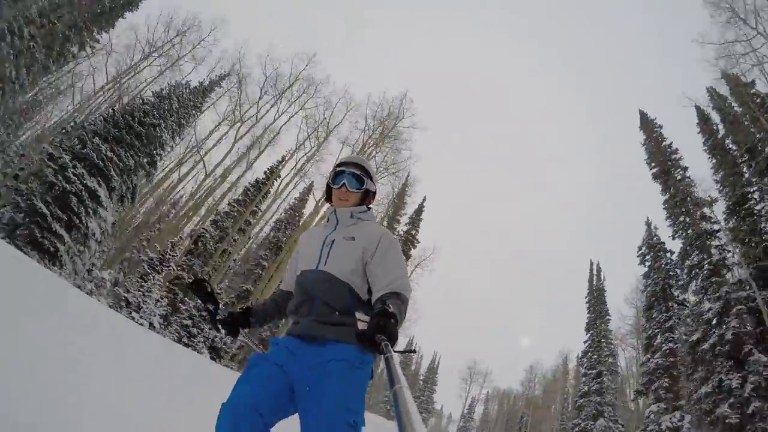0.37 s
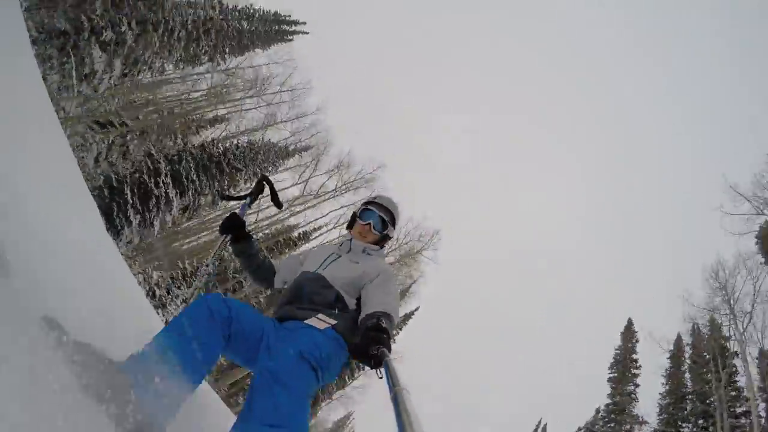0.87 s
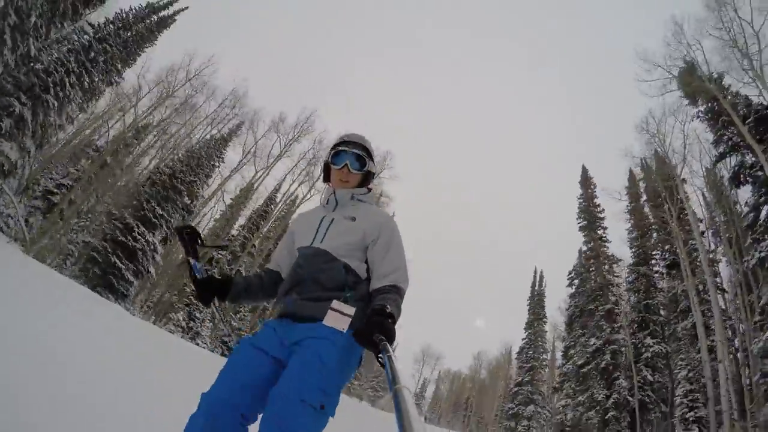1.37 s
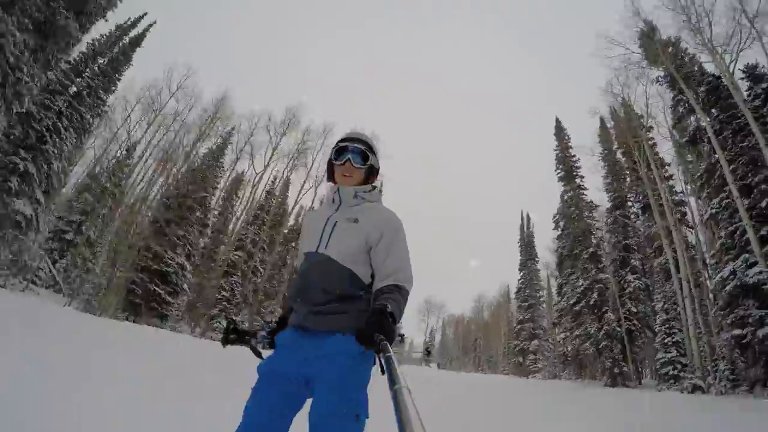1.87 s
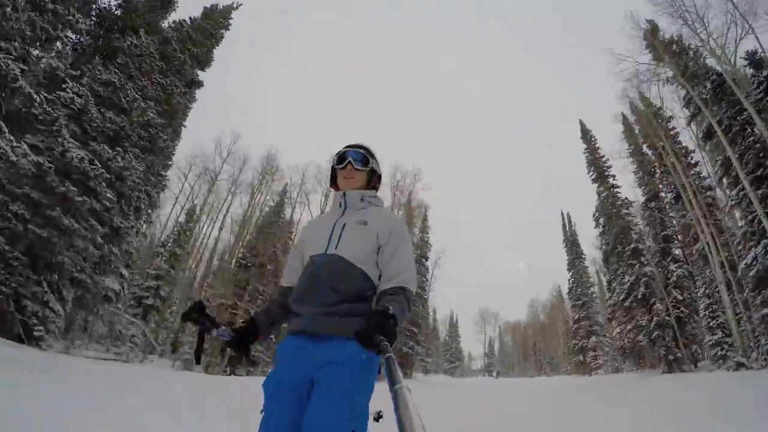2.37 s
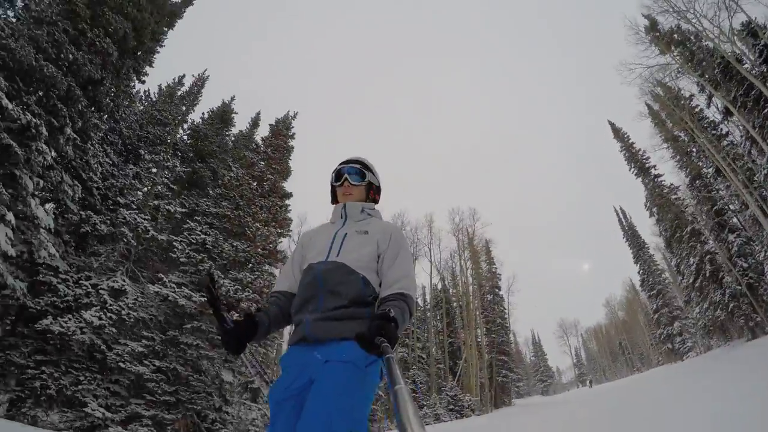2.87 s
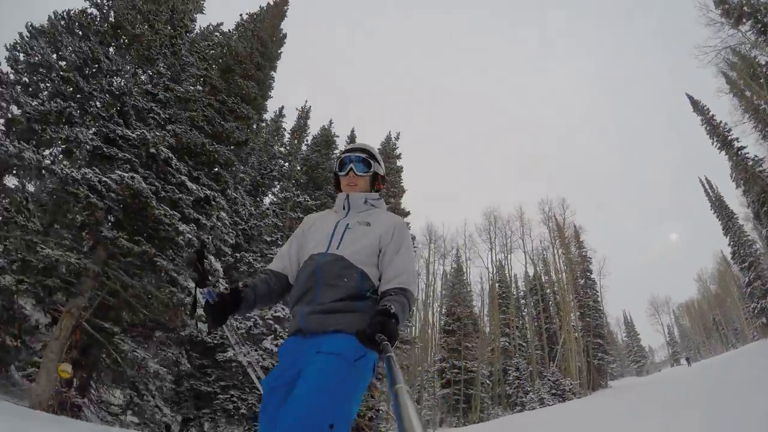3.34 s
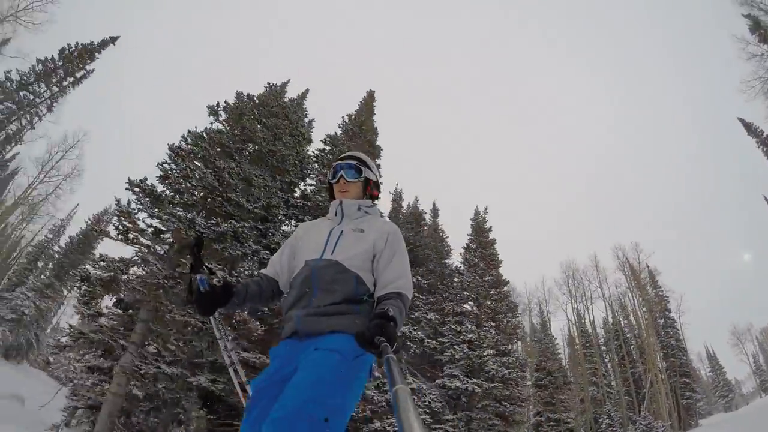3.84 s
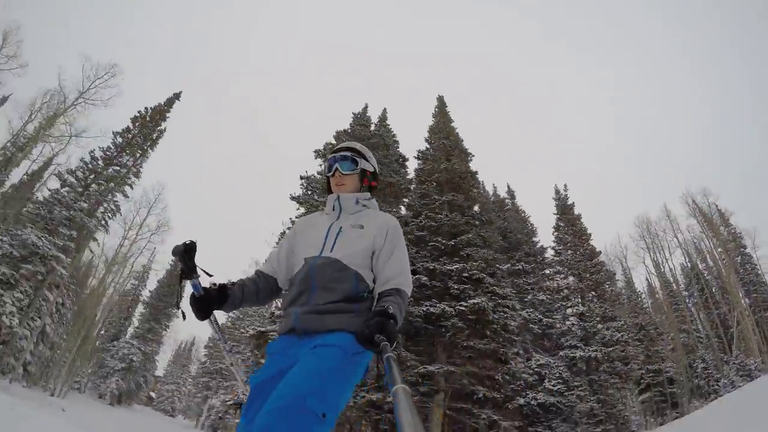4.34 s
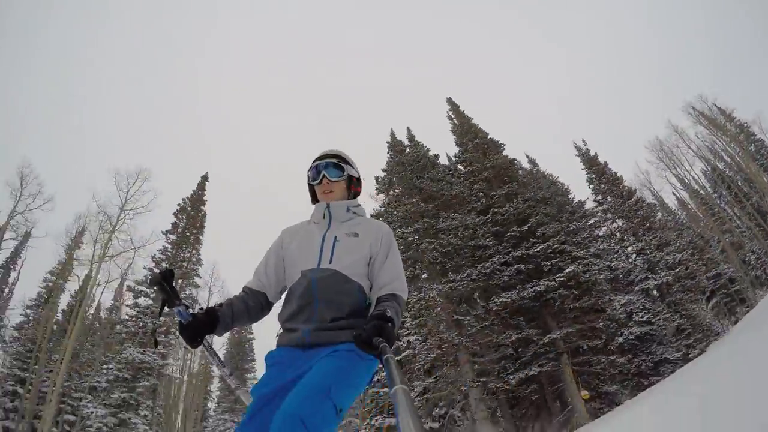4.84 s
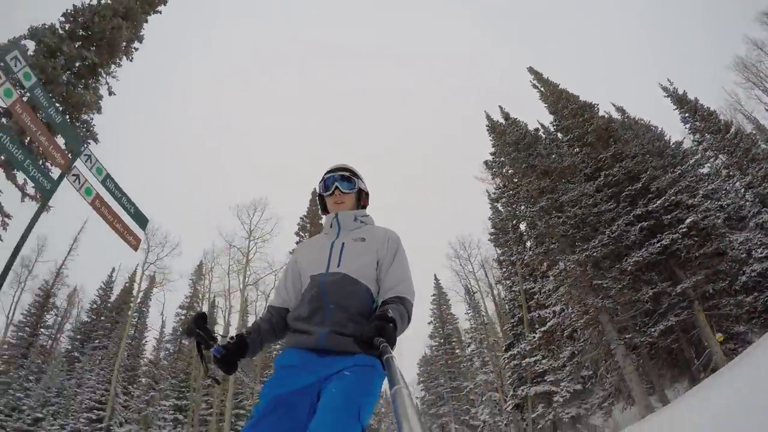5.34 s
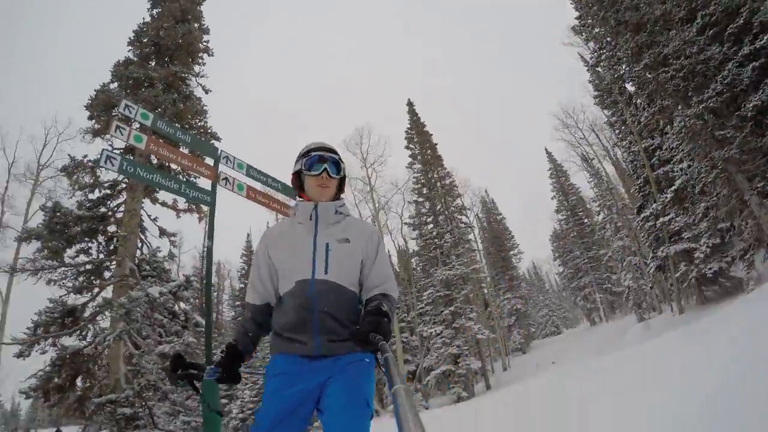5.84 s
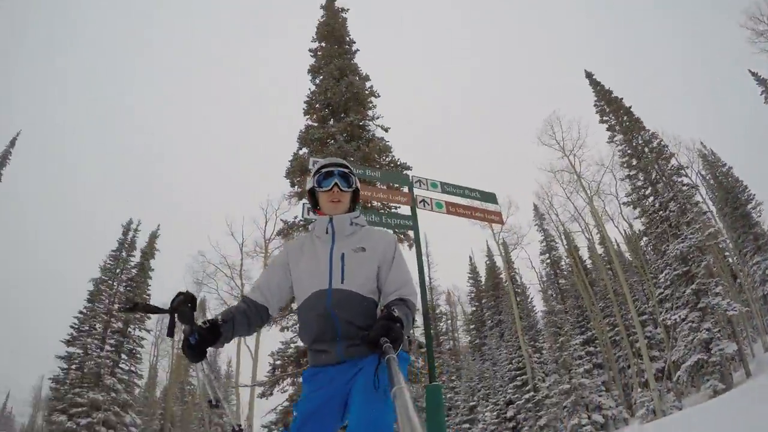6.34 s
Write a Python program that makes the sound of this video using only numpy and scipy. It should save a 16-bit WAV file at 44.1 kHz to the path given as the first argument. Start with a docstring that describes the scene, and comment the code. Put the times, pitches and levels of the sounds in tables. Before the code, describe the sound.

Skis hiss and crunch over snow as wind rumbles on a pole-mounted camera, with ticking grains, mount knocks and one deep jolt.

```python
"""Wind buffets the microphone port of a small housed camera on a pole: deep and fluttering bands of noise.
Its skier glides down a quiet slope: noise and clumped clicks hiss and crunch, narrow noise bands swell.
Snow grains tick on the housing as noisy clicks; skis and ticks pass the housing resonances.
Knocks, rubs and a late creak ring the modes of the mount; a jolt of the pole is a falling sine."""
import sys
import numpy as np
from scipy import signal
from scipy.fft import rfft, irfft
from scipy.io import wavfile
from scipy.ndimage import uniform_filter1d

SR = 44100
rng = np.random.default_rng(int(sys.argv[2]) if len(sys.argv) > 2 else 0)


def attenuation_scalar(level_db):
    """Turn a level in dB into a linear amplitude multiplier (20 dB per decade)."""
    decades = np.asarray(level_db, float) / 20
    return 10 ** decades


def bounce(signal):
    """Save signal as a 16-bit WAV file at the path given by the first command-line argument."""
    frames = np.transpose(np.atleast_2d(signal))
    limited = np.clip(frames, -1, 1)
    pcm = np.round(limited * 32767).astype(np.int16)
    wavfile.write(sys.argv[1], SR, pcm)


N = 295854


def unit_rms(x):
    """Scales to an rms of 1."""
    return x / np.sqrt(np.mean(x ** 2) + 1e-20)


def in_time(rows):
    """Interpolates each column at every sample; column 0 is t/s."""
    t_s, *columns = np.transpose(rows)
    return [np.interp(np.arange(N) / SR, t_s, column) for column in columns]


def band(x, low_hz, high_hz, order=2):
    """Butterworth bandpass."""
    sos = signal.butter(order, [low_hz, high_hz], "band", fs=SR, output="sos")
    return signal.sosfilt(sos, x + 1e-18)


def coloured(x, points):
    """Applies a spectral gain, interpolated in dB over log frequency."""
    f_hz = np.maximum(np.arange(N // 2 + 1) * SR / N, 1)
    point_hz, point_db = np.transpose(points)
    gain_db = np.interp(np.log(f_hz), np.log(point_hz), point_db)
    return irfft(rfft(x) * attenuation_scalar(gain_db), N)


def drift(corner_hz):
    """Slow random signal of rms 1: two-pole lowpassed noise."""
    step = 40  # samples between slow values
    r = np.exp(-2 * np.pi * corner_hz * step / SR)
    noise = rng.standard_normal(N // step + 2002)
    slow = signal.lfilter([1], [1, -2 * r, r * r], noise)[2000:]
    return np.interp(np.arange(N) / step, np.arange(len(slow)), unit_rms(slow))


def grains(per_s, spread_db):
    """Random clicks of either sign, a few much larger than the rest."""
    size_db = spread_db * np.minimum(rng.exponential(1, N), 5)
    signs = rng.choice([-1, 1], N)
    return attenuation_scalar(size_db) * signs * (rng.random(N) < per_s / SR)


def clicks(t_s, level_db):
    """Single-sample impulses at given times."""
    out = np.zeros(N)
    at = np.minimum(np.round(np.asarray(t_s) * SR).astype(int), N - 1)
    np.add.at(out, at, attenuation_scalar(level_db))
    return out


def fading(x, t60_s):
    """Every click leaves an exponentially dying trail."""
    return signal.lfilter([1], [1, -attenuation_scalar(-60 / (t60_s * SR))], x + 1e-18)


def ring(x, f_hz, t60_s):
    """A unit click sets a dying sine of initial height 1 ringing."""
    r = attenuation_scalar(-60 / (t60_s * SR))
    w = 2 * np.pi * f_hz / SR
    return signal.lfilter([0, np.sin(w)], [1, -2 * r * np.cos(w), r * r], x + 1e-18)


# housing resonances: f/Hz, width/Hz, gain/dB
HOUSING_BANDS = [(1300, 150, 4), (1735, 170, 9), (2480, 300, 6), (2870, 200, 6), (3230, 200, 4),
                 (3600, 250, 4), (3975, 120, -7), (4320, 300, 8), (5420, 200, 5), (5650, 150, -4),
                 (6850, 800, 8), (9950, 800, 7), (12200, 600, 5), (13750, 700, 5)]


def housing(x):
    """Cavities around the microphone lift most of a row of bands and dip the others."""
    for f_hz, width_hz, gain_db in HOUSING_BANDS:
        w = 2 * np.pi * f_hz / SR
        a = np.pi * width_hz / SR
        b = a * attenuation_scalar(gain_db)
        x = signal.lfilter([1 + b, -2 * np.cos(w), 1 - b], [1 + a, -2 * np.cos(w), 1 - a], x)
    return x


# wind on the port: t/s, deep buffeting level/dB, flutter level/dB
WIND_LEVELS = [(0.0, -25.5, -30.5), (0.4, -22.5, -52), (0.65, -29.5, -25.5), (0.72, -25, -30),
               (0.95, -23, -41), (1.159, -28, -65), (1.3, -39.5, -28.5), (1.46, -24, -43.5),
               (1.75, -37, -30), (2.05, -28.5, -44.5), (2.3, -32.5, -32.5), (2.42, -36.5, -43.5),
               (3.1, -31.5, -31.5), (3.5, -36, -32.5), (4.1, -32, -40), (4.4, -33.5, -39.5),
               (4.7, -28, -29.5), (5.0, -31, -30), (5.25, -32.5, -43), (5.72, -25.5, -58), (6.2, -34, -51),
               (6.5, -33, -47), (6.71, -32.5, -55)]
# buffeting spectrum: f/Hz, gain/dB
BUFFET_SPECTRUM = [(8.8, -21), (15, 6), (32, 0), (59, 0.5), (83, -17), (108, -29), (154, -41), (200, -75),
                   (260, -33.5), (440, -120)]


def wind():
    """Eddies push on the port, slow deep ones and a quicker flutter; each evened so that gusts set its swing."""
    gust_db, gust_hz = [2, 3.5], 8.2  # deep, flutter; drift corner
    low_hz, high_hz = [12, 55], [55, 260]
    out = 0
    eddies = coloured(rng.standard_normal((2, N)), BUFFET_SPECTRUM)
    for level_db, swing_db, eddy, low, high in zip(in_time(WIND_LEVELS), gust_db, eddies, low_hz, high_hz):
        push = unit_rms(band(eddy, low, high))
        local_rms = np.sqrt(uniform_filter1d(push ** 2, size=3000) + 0.049)
        gusts = attenuation_scalar(swing_db * drift(gust_hz))
        out = out + attenuation_scalar(level_db) * unit_rms(gusts * push / local_rms)
    return out


# skis on snow: t/s, edge pressure as scrape level/dB, low rasp over scrape/dB, brightness/dB
SKI_PRESSURE = [(0.0, -48.5, 7.5, -7.5), (0.3, -45.5, -19, -0.5), (0.5, -46, -7, -1), (0.76, -45.5, -19, 2),
                (1.1, -44.5, -1.5, -2), (1.29, -45.5, -2.5, -1), (1.48, -62, -5, 3.5), (1.7, -52, -19, 1),
                (2.07, -55.5, 4, -4.5), (2.4, -59.5, -2, 2.5), (2.7, -58, -7, -3), (3.25, -59.5, 4.5, -1.5),
                (3.7, -56, -1.5, 1), (4.07, -60, 2.5, 0), (4.2, -52.5, -1.5, 2), (4.32, -47.5, -4, 2),
                (4.4, -43, -1.5, 1.5), (4.55, -41, -3.5, 1.5), (4.8, -42.5, -6, -0.5), (4.97, -50, -3, 1.5),
                (5.19, -52, -5, 0.5), (5.28, -48.5, -3, 1), (5.4, -53.5, 0.5, -0.5), (5.52, -46, 1.5, -1),
                (5.62, -46, 0, -3), (5.69, -47.5, -3.5, 0), (5.77, -43, -3.5, -2.5), (5.84, -47, -3.5, -2),
                (6.05, -52, -2.5, -2.5), (6.3, -58, -0.5, -4.5), (6.56, -60, 2, -5.5), (6.63, -51, -1, -11),
                (6.71, -56.5, 2, -6)]
# low rumble of the skis: t/s, level/dB
SKI_RUMBLE = [(0.0, -46), (0.76, -46.5), (1.2, -53.5), (1.6, -53), (2.6, -54), (3.2, -54), (3.8, -57.5),
              (4.1, -56.5), (4.55, -49), (5.1, -57), (6.5, -59.5), (6.71, -56)]
# bands above the scrape: level at reference pressure/dB, share of pressure swing/1, share of brightness/1
SPRAY_BANDS = [(-57, 0.74, 0.88), (-66.5, 0.52, 0.85), (-74, 0.3, 0.61)]
# snow spectrum: f/Hz, gain/dB
SNOW_SPECTRUM = [(100, 14.5), (200, -11.5), (350, -10.5), (800, -16), (1100, -5.5), (1500, 1), (2100, -9),
                 (3500, -11), (5000, -22), (7200, -28.5), (8200, -36), (12000, -44), (16000, -38)]


def skis():
    """Smooth sliding noise plus crystals that break in clumps; all bands share the same crunch."""
    reference_db = -52  # scrape level at reference pressure
    clumps = attenuation_scalar(1.4 * drift(13.0) + 2.5 * drift(40.0))
    crunch = unit_rms(grains(1500.0 * clumps, spread_db=4.5))
    slide = rng.standard_normal(N) * attenuation_scalar(0.5 * drift(19.0))
    snow = housing(coloured(slide + 0.62 * crunch, SNOW_SPECTRUM))

    scrape_db, rasp_db, bright_db = in_time(SKI_PRESSURE)
    levels_db = in_time(SKI_RUMBLE) + [scrape_db + rasp_db, scrape_db]
    for base_db, pressure_share, bright_share in SPRAY_BANDS:
        pressure_db = pressure_share * (scrape_db - reference_db)
        levels_db.append(base_db + pressure_db + bright_share * bright_db)

    out = 0
    edges_hz = [130, 950, 2100, 4700, 8500, 11500, 15300]
    for level_db, low_hz, high_hz in zip(levels_db, edges_hz, edges_hz[1:]):
        hiss = unit_rms(band(snow, low_hz, high_hz, order=3))
        out = out + attenuation_scalar(level_db + 1.38 * drift(24.0)) * hiss
    return out


# narrow swelling hisses: t/s, length/s, level/dB, start f/Hz, end f/Hz, half width/Hz
AIRY_HISSES = [(0.0, 0.64, -60.5, 6900, 6940, 400), (0.221, 0.36, -48.5, 2700, 2906, 200),
               (0.997, 0.3, -46, 2410, 2910, 300), (4.3, 0.47, -50, 1748, 1732, 100),
               (5.7, 0.38, -69, 13500, 13000, 700), (5.72, 0.3, -51, 3520, 3600, 150),
               (4.187, 0.14, -43.5, 2485, 2470, 120), (5.394, 0.45, -58.5, 13800, 12600, 800),
               (5.405, 0.74, -47.5, 1762, 1717, 90), (5.577, 0.39, -54.5, 7080, 6620, 450),
               (6.585, 0.093, -56, 6370, 6230, 600)]


def airy():
    """Narrow bands of noise, each swelling and fading on a gliding carrier."""
    out, t_s = np.zeros(N), np.arange(N) / SR
    for start_s, length_s, level_db, start_hz, end_hz, half_width_hz in AIRY_HISSES:
        progress = np.clip((t_s - start_s) / length_s, 0, 1)
        turns = np.cumsum(start_hz + (end_hz - start_hz) * progress) / SR
        noise = unit_rms(band(rng.standard_normal(N), 11, half_width_hz))
        out += attenuation_scalar(level_db) * np.sin(np.pi * progress) * np.sin(2 * np.pi * turns) * noise
    return out


# harder grains on the housing: t/s, hit level/dB, body over hit/dB (before the band gain)
GRAIN_HITS = [(0.0074, -29.5, 3.5), (0.017, -27.5, -2), (0.061, -41, -10), (0.0994, -29, -5),
              (0.111, -29.5, 1), (0.128, -25, -0.5), (0.158, -27.5, 9), (0.169, -22.5, -13),
              (0.178, -37, -2), (0.1994, -35, -1), (0.212, -38, 3), (0.215, -26, 7.5), (0.227, -32, -10),
              (0.2487, -30.5, -1), (0.256, -31, -5), (0.261, -41, 9), (0.268, -33.5, 8), (0.29, -39, -4),
              (0.3297, -34, 2), (0.366, -33, -3), (0.372, -36, 6), (0.381, -41, 6), (0.404, -38.5, 12.5),
              (0.415, -31, 0.5), (0.425, -31, 1), (0.439, -31, -8), (0.4472, -28.5, -1), (0.452, -36, 3.5),
              (0.4771, -28, -1), (0.4833, -33, 3), (0.493, -33, -1), (0.504, -34, -7), (0.574, -43, 2),
              (0.5797, -31.5, -4), (0.592, -39, 10), (0.626, -45, -8), (0.6323, -31, 8), (0.641, -30, -5),
              (0.647, -35, 12), (0.669, -41, 8), (0.693, -33, -8), (0.701, -30.5, -6), (0.7098, -42, 13),
              (0.719, -41, 13), (0.727, -33, -10), (0.782, -28, 3), (0.8125, -37.5, 9), (0.825, -38, 12),
              (0.902, -37, 5), (0.923, -41, 7), (0.936, -46, -10), (0.963, -49, -8), (1.04, -30.5, -7),
              (1.07, -27.5, 5.5), (1.0766, -33, -1), (1.31, -40, -3), (1.3423, -46, -5), (1.359, -49, -14),
              (1.378, -39, -2), (1.389, -45, -4), (1.495, -41, 1), (1.502, -33.5, -1), (1.535, -48, 11),
              (1.6526, -59, 2), (1.6795, -36.5, 11), (1.685, -39, -2), (1.7062, -28.5, -11),
              (1.7124, -37, 1), (1.7313, -43, 4), (1.741, -33, -13), (1.7468, -43.5, 8.5), (1.76, -46, 7),
              (1.775, -38, -2), (1.788, -38, 0), (1.7976, -39, 4), (1.822, -36, -2), (2.0169, -31.5, -23),
              (2.0476, -34, -15), (2.056, -33.5, -3), (2.063, -40, -12), (2.069, -38, 2), (2.081, -43, 1),
              (2.1313, -42, -2), (2.2267, -35, 8.5), (2.238, -32.5, -5), (2.248, -40, -4),
              (2.3046, -30, 0.5), (2.3155, -42, 0), (2.3977, -33.5, -0.5), (2.4218, -40, 1.5),
              (2.4545, -50, 7), (2.4892, -32.5, -0.5), (2.5144, -39, 1), (2.5274, -37, 0),
              (2.5324, -35.5, 1.5), (2.552, -43, 5.5), (2.563, -38, -1), (2.6457, -36, -32),
              (2.6636, -48, -2), (2.711, -41, 1.5), (2.722, -46, -5), (2.7447, -40, 5),
              (2.761, -37.5, -0.5), (2.86, -45, 2.5), (2.8951, -35.5, -5), (2.905, -43, 9.5),
              (2.9325, -35.5, 0), (2.954, -36.5, -18), (2.9912, -45, -18), (3.0995, -39.5, 4),
              (3.153, -34.5, -12), (3.17, -43, -16), (3.2412, -47.5, 8), (3.249, -45, -4),
              (3.2716, -30.5, 2.5), (3.282, -36.5, -5), (3.382, -43.5, 9.5), (3.392, -42, -6),
              (3.402, -31.5, -4), (3.411, -42, -6), (3.417, -50.5, 9), (3.4257, -35, 1), (3.449, -44, -8),
              (3.459, -38.5, -1), (3.475, -43, -10), (3.518, -41, 3.5), (3.54, -55, 4), (3.557, -58, 1),
              (3.5855, -42, -3), (3.5926, -42, -2), (3.656, -41, 6.5), (3.7033, -31, -1.5),
              (3.72, -40, 6.5), (3.7924, -38, 1), (3.818, -45, -6), (3.952, -37.5, -14), (3.974, -51, 8),
              (4.0472, -38, 0), (4.8928, -55, -7), (4.913, -35, -2), (5.137, -33, -10), (5.294, -42, -6),
              (5.324, -43, -14), (5.3656, -41, 4), (5.524, -41, 5), (5.283, -52, 13), (5.741, -35, -6),
              (5.8321, -39, -2), (5.9756, -41, 8.5), (6.609, -50, 5), (6.622, -57, 0), (6.646, -42, 8),
              (6.671, -46, 9)]
# faint random grains: t/s, rate/(1/s)
FAINT_GRAINS = [(0, 20), (4.1, 12), (4.3, 2), (6.71, 0.5)]


def ticks():
    """A hard grain clicks and shatters within milliseconds; smaller grains follow in its wake."""
    hit_s, hit_db, body_db = np.transpose(GRAIN_HITS)
    faint = attenuation_scalar(-47.5) * np.abs(grains(in_time(FAINT_GRAINS)[0], spread_db=2.0))
    hit = clicks(hit_s + 0.0007, hit_db) + faint
    shatter = hit + attenuation_scalar(-14.0) * fading(hit, 0.011) * rng.standard_normal(N)
    shatter = shatter + attenuation_scalar(-24.0) * fading(hit, 0.26) * grains(60.0, spread_db=3.5)
    body_gain_db = np.interp(np.arange(N) / SR, hit_s, body_db) + 15.0
    body = band(shatter * attenuation_scalar(body_gain_db), 1590, 4700, order=3)
    middle = band(shatter * attenuation_scalar(10.0), 3330, 8030)
    edge = band(shatter * attenuation_scalar(drift(64.0)), 7170, 12600)  # swings by 1 dB rms
    return housing(body + middle + edge)


# modes of the mount: f/Hz, gain/dB, t60/s
MOUNT_MODES = [(126, -15, 0.091), (143.5, 10, 0.058), (217, -6, 0.028), (285, -8, 0.092), (320, -10, 0.08),
               (430.5, 5, 0.025), (530, -1, 0.034), (690, -1.5, 0.022), (1128, -13, 0.048),
               (1335, 7, 0.0059), (1680, -11.5, 0.019), (2060, 7, 0.0049), (2420, 6.5, 0.0079),
               (2580, -5.5, 0.0067)]
# knocks: t/s, level/dB, then over that level: thud/dB, clack/dB, snap/dB
MOUNT_KNOCKS = [(0.19, -55, -7, 13, 2), (0.386, -32, -11, 5, -8), (0.403, -34.5, -12, -1, 1),
                (0.441, -37, 1.5, 2, -4), (0.55, -37.5, -6, -7, -15), (0.6465, -36, -2.5, 4, 14.5),
                (0.7258, -22, 1.5, 8.5, -19), (0.761, -25.5, -6.5, 0, -19), (0.7765, -26.5, -12, 12, -8),
                (0.8115, -48, -13, 0, 20.5), (0.871, -26.5, -31, 4, -4), (0.948, -42.5, -7, 10, -8),
                (1.0698, -49, -18, -18, 28.5), (1.214, -40.5, 3, -16, 4), (1.262, -41, -27, -3, -3),
                (1.425, -31.5, 6.5, 6.5, -14), (1.473, -33.5, -4, -9, -11), (1.5035, -26.5, -1.5, -2, -13),
                (1.5445, -35.5, -10.5, -8, 9), (1.6875, -32, -8, 3, 2), (1.736, -31, -7, 10, -17),
                (1.897, -50, -22, 12, 11), (2, -37, -13, 12, 3), (2.377, -56, -5, 16.5, -3),
                (2.776, -40, -10, 2, -12), (3.046, -53, 10, -7, 20.5), (3.128, -36, -3, -3, -11),
                (3.155, -26.5, -9.5, 5.5, -1.5), (3.298, -48, -13, 18.5, 4), (3.313, -54.5, -14, 20, -3),
                (3.426, -27, -15, 5.5, 1), (3.453, -39, -19, -6, 1), (3.67, -47, -7, 0, 8),
                (3.696, -46, 1, 8.5, 1), (3.799, -25.5, -11.5, -0.5, -14), (3.847, -43, -19, -3, 2),
                (3.99, -57, -12, -9, 14), (4.017, -57, -12, 18, 10), (4.047, -33.5, -23, -8, -18),
                (4.988, -38.5, -10, 2.5, -10), (5.174, -53.5, -2, 5, 25.5), (5.198, -43, -21, 13, 19),
                (6.221, -52.5, -8, 16, 13.5), (6.6455, -52, -11, 2, 22), (6.696, -60, -6, 17, 5)]
# rubs of the joint: t/s, length/s, level/dB, snap over that/dB
JOINT_RUBS = [(0.383, 0.033, -46, -15), (0.69, 0.1, -48.5, 3.5), (0.861, 0.045, -46, 1),
              (1.183, 0.053, -67, 12), (1.422, 0.082, -49.5, -9), (1.491, 0.026, -53, 3),
              (1.529, 0.034, -48.5, 0), (1.682, 0.039, -36.5, -8), (1.739, 0.011, -42, -5),
              (1.988, 0.052, -44.5, -8), (3.002, 0.033, -59.5, 6), (3.033, 0.035, -51, -18),
              (3.071, 0.017, -49, 3.5), (3.11, 0.072, -47, -3), (3.295, 0.058, -56, -3),
              (3.431, 0.036, -47.5, -7), (3.48, 0.03, -54, -12), (3.657, 0.025, -54, -11),
              (3.73, 0.14, -51, 0), (3.988, 0.041, -50.5, 2), (6.576, 0.043, -67, 8)]


def mount():
    """Knocks, rubs and creak strike the same modes; every knock draws new mode strengths."""
    knock_s, knock_db, thud_db, clack_db, snap_db = np.transpose(MOUNT_KNOCKS)
    slip_s, slip_db, slip_snap_db = creak()
    grit = unit_rms(grains(1600.0 * attenuation_scalar(6.0 * drift(60.0)), spread_db=2.0))
    chance_db = rng.normal(0, 1.5, (len(knock_s), len(MOUNT_MODES)))
    contacts = 1.2 * grains(5000.0, spread_db=2.0)
    out = np.zeros(N)
    for k, (f_hz, mode_db, t60_s) in enumerate(MOUNT_MODES):
        bright = f_hz > 1800
        colour_db = thud_db * (f_hz < 300) + clack_db * (900 < f_hz < 1800) + snap_db * bright
        # deep modes answer 0.9 cycles late, as the blow travels down the pole
        lag_s = 0.9 / f_hz * (f_hz < 900)
        blows = clicks(knock_s + 0.001486 + lag_s, knock_db + colour_db + chance_db[:, k] - 8.0)
        # a loose joint chatters for some milliseconds after the blow
        blows = blows + attenuation_scalar(-15.0) * contacts * fading(blows, 0.026)

        light = clicks(slip_s + 0.0012, slip_db + slip_snap_db * bright - 9.0)
        light = light + attenuation_scalar(-13.5) * contacts * fading(light, 0.012)
        for start_s, length_s, rub_db, rub_snap_db in JOINT_RUBS:
            at = np.arange(round(start_s * SR), min(round((start_s + length_s) * SR), N))
            envelope = np.hanning(len(at)) ** 0.16
            light[at] += attenuation_scalar(rub_db + rub_snap_db * bright - 17.0) * envelope * grit[at]

        # light touches hardly move the deep modes
        rung = ring(blows + light * min(1, f_hz / 1200), f_hz, t60_s)
        if f_hz > 900:
            rung = band(rung, 0.49 * f_hz, 8.3 * f_hz)
        out += attenuation_scalar(mode_db) * rung
    # the pole and its clamp pass little treble
    return band(out, 84, 2660, order=4)


# jolt of the pole: t/s, level/dB, start f/Hz, end f/Hz, glide time constant/s, length/s
POLE_JOLTS = [(.727, -7, 89, 24, .02, .15)]


def jolts():
    """The pole swings with a falling pitch until the hand damps it."""
    out = np.zeros(N)
    for start_s, level_db, start_hz, end_hz, glide_s, length_s in POLE_JOLTS:
        t_s = np.maximum(np.arange(N) / SR - start_s, 0)
        glide_turns = (start_hz - end_hz) * glide_s * (1 - np.exp(-t_s / glide_s))
        turns = end_hz * t_s + glide_turns
        out -= attenuation_scalar(level_db) * np.exp(-(t_s / length_s) ** 4) * np.sin(2 * np.pi * turns)
    return out


# separate slips of the creaking joint: t/s, level/dB
JOINT_SLIPS = [(6.458, -41), (6.474, -37.5), (6.491, -58), (6.505, -42.5), (6.519, -55), (6.533, -48),
               (6.546, -43), (6.56, -48), (6.573, -48), (6.585, -48), (6.59, -52), (6.595, -60),
               (6.607, -44), (6.61, -43), (6.617, -49), (6.635, -51), (6.656, -45), (6.671, -45),
               (6.681, -59), (6.698, -49)]


def creak():
    """Slips of the joint as times, strengths and snap over strength, brighter towards the end."""
    slip_s, slip_db = np.transpose(JOINT_SLIPS)
    snap_db = np.interp(slip_s, slip_s[[0, -1]], [-3, 14.5])
    return slip_s, slip_db, snap_db


def scene():
    """Sums all sources into one channel."""
    return (wind() + skis() + airy() + ticks() + mount() + jolts())[None]


def top_cut(x):
    """Nothing passes above the cut-off."""
    return signal.sosfilt(signal.butter(12, 16440, fs=SR, output="sos"), x)


def record(dry):
    """Takes the sum of the sources as the finished mix."""
    return top_cut(dry)


dry = scene()
out = record(dry)
bounce(out)
```